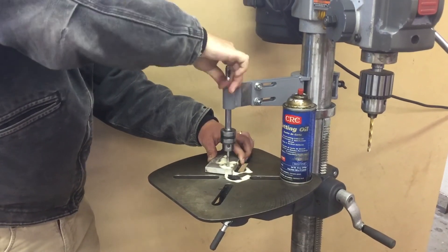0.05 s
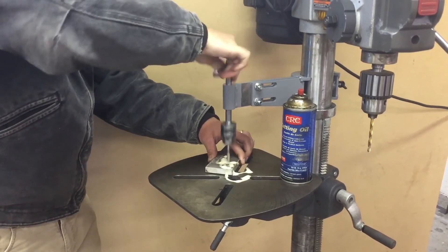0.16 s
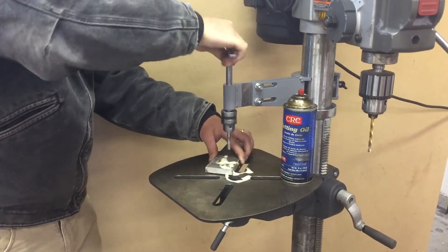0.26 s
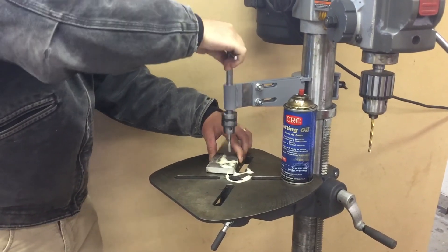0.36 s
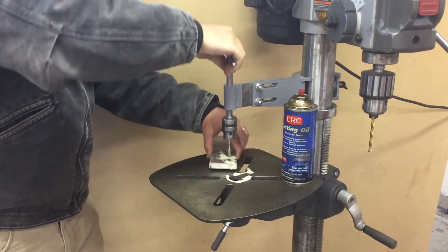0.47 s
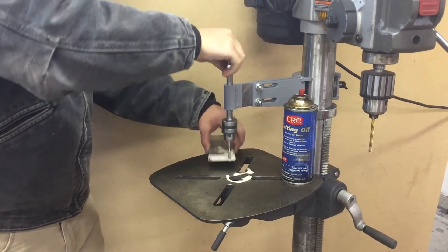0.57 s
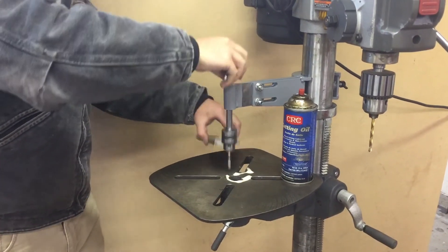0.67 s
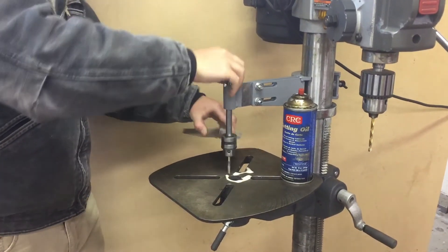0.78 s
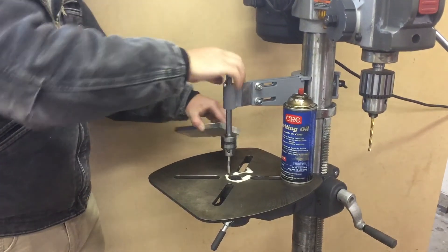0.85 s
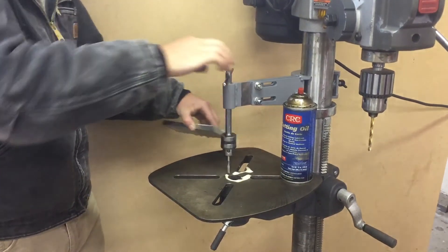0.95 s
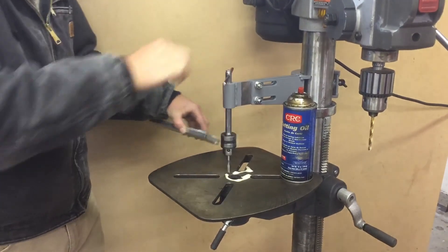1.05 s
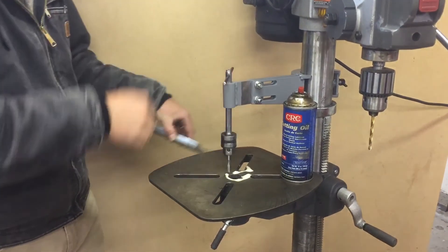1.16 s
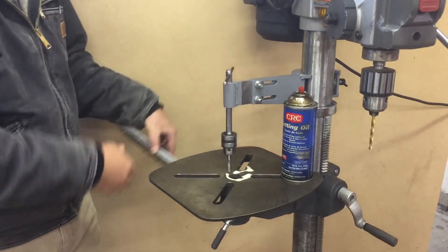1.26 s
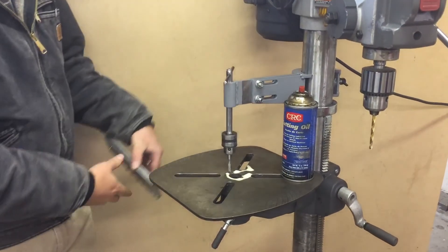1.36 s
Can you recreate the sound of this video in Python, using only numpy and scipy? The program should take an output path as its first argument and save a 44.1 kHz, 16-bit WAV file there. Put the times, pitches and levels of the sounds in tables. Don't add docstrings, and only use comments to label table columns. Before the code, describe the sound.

A small metal plate scrapes over a steel table, clanks against a tap, then knocks the table edge

```python
import sys
import numpy as np
from scipy import signal
from scipy.fft import rfft, irfft
from scipy.io import wavfile
from scipy.ndimage import uniform_filter1d

SR = 44100
rng = np.random.default_rng(int(sys.argv[2]) if len(sys.argv) > 2 else 0)


def transcribe(signal):
    frames = np.atleast_2d(signal).T
    limited = np.clip(frames, -1, 1)
    pcm = np.round(limited * 32767).astype(np.int16)
    wavfile.write(sys.argv[1], SR, pcm)


def how_loud(loudness_db):
    steps = np.asarray(loudness_db, float) / 20
    return 10 ** steps


N = 63945

# time in seconds, level in dB.
CLANK_CONTACTS = [
    (.3184, -16.5),
    (.3198, -12),
    (.3216, -13),
    (.3250, -14),
    (.3276, -17),
    (.3315, -23),
    (.336, -24),
    (.362, -25.5),
]
# frequency in Hz, level in dB per Hz.
TAP_SPECTRUM = [(71, -45), (120, -20), (624, -9.5), (2810, -4), (3110, 1), (7860, -12.5), (11200, -12),
                (14900, -17), (16500, -51)]
# frequency in Hz, time to fall 60 dB in seconds.
TAP_DECAY = [(150, 0.91), (500, 0.15), (1500, 0.21), (4000, 0.16), (8000, 0.078), (15000, 0.014)]
# time in seconds, level in dB.
KNOCK_CONTACTS = [
    (.8048, -19.5),
    (.8065, -15.5),
    (.8125, -19.5),
    (.8155, -20.5),
    (.820, -19.5),
    (.826, -28),
    (.833, -19),
    (.839, -65),
]


def evened(x):
    return x / np.sqrt(np.mean(x ** 2) + 1e-20)


def read(points, hz):
    f, value = np.transpose(points)
    return np.interp(np.log(hz + 1), np.log(f + 1), value)


def colour(x, points):
    gain = how_loud(read(points, np.fft.rfftfreq(len(x), 1 / SR)))
    return irfft(rfft(x) * gain, len(x))


def wobble(length, span_s):
    span = int(span_s * SR) + 1
    z = rng.standard_normal((length, 2))
    for _ in range(2):
        z = uniform_filter1d(z, span, axis=0)
    return evened(z[:, 0]) + 1j * evened(z[:, 1])


def dying(x, t60):
    hz, t, z = signal.stft(x, SR, nperseg=256)
    fall_s = np.maximum(read(t60, hz), .02)[:, None]
    return signal.istft(z * how_loud(-60 * t / fall_s), SR, nperseg=256)[1][:len(x)]


def rings(modes, rough=0):
    t = np.arange(SR // 2) / SR
    total = np.zeros(len(t))
    for hz, db, t60 in modes:
        waver = 1 + rough * wobble(len(t), .025)
        tone = waver * np.exp(2j * np.pi * (hz * t + rng.random()))
        total += how_loud(db - 60 * t / t60) * tone.real
    return total


def room(x):
    # frequency in Hz, time to fall 60 dB in seconds.
    room_decay = [(200, 0.6), (600, 0.51), (2000, 0.55), (4000, 0.54), (12000, 0.28)]
    taps = np.zeros(SR)
    at = np.arange(300, SR - 20, 20)
    taps[at + rng.integers(0, 20, len(at))] = rng.choice([-1., 1.], len(at))
    tail = dying(taps, room_decay)
    return signal.fftconvolve(x, tail / np.linalg.norm(tail))[:N]


def drag(stroke, spectrum, peaks, ring_db):
    grit_per_s, grit_spread_db = 5000, 3.5
    s, db, bright = np.transpose(stroke)
    t = np.arange(N) / SR
    strength = how_loud(grit_spread_db * np.minimum(rng.exponential(1, N), 4))
    grit = strength * (rng.random(N) < grit_per_s / SR) * rng.choice([-1, 1], N)
    modes = [(hz, level, 3.5 / width) for hz, width, level in peaks]
    sung = signal.fftconvolve(grit, rings(modes))[:N]
    rasp = evened(colour(grit, spectrum)) + how_loud(ring_db - 4) * evened(sung)
    hz, at, z = signal.stft(rasp, SR, nperseg=256)
    tilt = np.log2(np.maximum(hz, 200) / 2000)[:, None] * np.interp(at, s, bright)
    rasp = signal.istft(z * how_loud(tilt), SR, nperseg=256)[1][:N]
    rasp = signal.sosfilt(signal.butter(10, 15500, fs=SR, output="sos"), rasp)
    out = rasp * how_loud(np.interp(t, s, db, left=-120, right=-120))
    return out + how_loud(-4.5) * room(out)


def first_stroke():
    # time in seconds, level in dB, brightness in dB per octave above 2 kHz.
    drag_path = [(.178, -61.5, 1.5), (.186, -52, -2), (.2, -45, 1), (.204, -37, 0.5), (.216, -40.5, 3.5),
                 (.221, -30, 2.5), (.232, -34.5, 2.5), (.25, -36, 0), (.27, -42.5, -1.5), (.285, -41, 2),
                 (.31, -38, -1), (.474, -51.5, -2.5), (.484, -42, 4), (.51, -50, -0.5), (.56, -62.5, -8),
                 (.61, -82, 1)]
    # frequency in Hz, level in dB per Hz.
    drag_spectrum = [(100, -23), (200, -8), (400, 1), (900, -5.5), (2300, -1), (4500, -12.5), (15000, -42),
                     (15900, -69.5)]
    # resonance in Hz, its width in Hz, level in dB.
    drag_peaks = [(405.8, 31, 2), (671.6, 21, -3), (1840, 35, -2), (1113, 80, -2), (2063, 250, -1),
                  (2358, 54, 1), (2530, 90, -0.5), (2830, 60, -3.5), (3214, 220, 3.5), (4310, 200, -1),
                  (5360, 150, -5.5), (5620, 84, -8.5)]
    return drag(drag_path, drag_spectrum, drag_peaks, ring_db=1.5)


def second_stroke():
    # time in seconds, level in dB, brightness in dB per octave above 2 kHz.
    slide_path = [
        (.645, -76, 3),
        (.665, -54, -3.5),
        (.695, -56, 0.5),
        (.715, -50.5, -2.5),
        (.745, -52.5, -3.5),
        (.78, -50, -2.5),
        (.81, -49, 6.5),
        (.84, -64, -15.5),
    ]
    # frequency in Hz, level in dB per Hz.
    slide_spectrum = [(150, -32.5), (400, -3), (600, -9.5), (900, -9), (1800, -1), (4000, -13),
                      (15900, -42.5)]
    # resonance in Hz, its width in Hz, level in dB.
    slide_peaks = [(532, 45, 4.5), (596, 40, 1), (672, 150, 1), (790, 69, -6.5), (1160, 38, -2),
                   (1470, 50, -11), (1960, 100, -3.5), (2360, 80, -5), (2754, 54, -12.5)]
    return drag(slide_path, slide_spectrum, slide_peaks, ring_db=2.0)


def blow(rows, spectrum, t60, crack_s, crack_db, dense_db):
    t, out = np.arange(SR // 2) / SR, np.zeros(N + SR)
    for s, db in rows:
        noise = evened(colour(rng.standard_normal(len(t)), spectrum))
        crack = noise * how_loud(crack_db) * np.exp(-t / crack_s)
        body = crack + how_loud(dense_db) * dying(noise, t60)
        out[round(s * SR):][:len(t)] += how_loud(db) * body * np.minimum(t / 0.000309, 1)
    return out[:N]


def clank():
    return blow(CLANK_CONTACTS, TAP_SPECTRUM, TAP_DECAY, crack_s=0.00094, crack_db=4.5, dense_db=-12)


def knock():
    # frequency in Hz, level in dB per Hz.
    edge_spectrum = [(120, -19.5), (480, -12), (620, -1), (1200, -5.5), (2100, -7), (4500, -16),
                     (5000, -20.5), (15000, -29), (15900, -62)]
    # frequency in Hz, time to fall 60 dB in seconds.
    edge_decay = [(150, 0.94), (500, 0.28), (1500, 0.29), (4000, 0.22), (8000, 0.11), (15000, 0.081)]
    return blow(KNOCK_CONTACTS, edge_spectrum, edge_decay, crack_s=0.00061, crack_db=-2.5, dense_db=-10.5)


def struck(start_s, modes, swell_s):
    t, out = np.arange(SR // 2) / SR, np.zeros(N + SR)
    damp_db_per_s2 = 220
    for group, db in modes:
        fade = how_loud(db - damp_db_per_s2 * t ** 2) * np.minimum(t / swell_s, 1)
        out[round(start_s * SR):][:len(t)] += fade * rings(group, .14)
    return out[:N]


def plate_ringing():
    # tone in Hz, level in dB, time to fall 60 dB in seconds.
    plate_low = [(562.4, -14.5, 1), (677, -19, 0.12), (853, -23, 0.34), (1157, -8, 0.41), (2090, -3, 0.17),
                 (2480, -4.5, 0.17), (2575, -13, .15), (3036, -5.5, 0.19), (3142, -9, 0.22),
                 (3660, -24, 0.51), (4187, -17, 0.22)]
    plate_high = [(6660, -12.5, .2), (8540, -9.5, 0.18), (10200, 0.5, 0.15), (10750, 2.5, 0.19),
                  (13300, -6, 0.064), (14720, -9.5, .1)]
    return struck(CLANK_CONTACTS[0][0], [(plate_low, -24), (plate_high, -34)], swell_s=0.0019)


def table_ringing():
    # tone in Hz, level in dB, time to fall 60 dB in seconds.
    table_low = [(284, -8.5, 0.34), (548, -3, 0.33), (675.4, -2.5, 0.79), (835, 5, 0.1), (899, 2.5, 0.14),
                 (956, 4, 0.13), (1077, 2, 0.18), (1208, -2, 0.23), (1530, -5.5, 0.53), (1794, 0, 0.4),
                 (1879, -16, 0.71), (2140, -23, 0.22), (2283, -12, 0.14)]
    table_high = [(2430, 4.5, 0.17), (2606, -2, 0.24), (2781, 1.5, 0.34), (2900, 2.5, 0.22),
                  (2990, -4.5, 0.37), (3264, -17, 0.49), (3650, -4.5, 0.15), (4000, -6, 0.14),
                  (4226, -5.5, 0.17), (4520, -9.5, 0.19), (4680, -24, 0.098), (5280, -2, 0.086),
                  (6120, -4, 0.076)]
    return struck(KNOCK_CONTACTS[0][0], [(table_low, -25), (table_high, -29)], swell_s=.011)


def settling():
    # time in seconds, level in dB.
    settle_contacts = [
        (.334, -28.5),
        (.345, -34),
        (.358, -37),
    ]
    # tone in Hz, level in dB, time to fall 60 dB in seconds.
    settle_tones = [(275, -7.5, 0.22), (384, 2, 0.16), (465, -8.5, 0.54), (564, -3.5, 0.43),
                    (146, -23, 0.42)]
    impulses = np.zeros(N)
    for s, db in settle_contacts:
        impulses[round(s * SR)] += how_loud(db) * rng.choice([-1, 1])
    swell = np.minimum(np.arange(SR // 2) / SR / .004, 1)
    return signal.fftconvolve(impulses, rings(settle_tones, 0.26) * swell)[:N]


def chirps():
    # time in seconds, level in dB.
    touches = [
        (.1888, -56.5),
        (.1958, -52.5),
        (.2028, -49),
        (.218, -46.5),
        (.2215, -45.5),
        (.4812, -52),
        (.4932, -43),
        (.7132, -63),
    ]
    return blow(touches, TAP_SPECTRUM, TAP_DECAY, crack_s=0.0035, crack_db=-8.5, dense_db=-11)


def brief_tones():
    # start in seconds, length in seconds, pitch in Hz.
    tone_list = [(.216, .01, 9200), (.27, .022, 13500), (.28, .02, 11400), (.283, .02, 14600),
                 (.481, .008, 4400), (.479, .022, 9840), (.481, .01, 6300), (.481, .012, 8440),
                 (.497, .025, 13900), (.535, .075, 3430), (.50, .095, 1594), (.56, .06, 673),
                 (.665, .03, 680), (.714, .025, 1260), (.722, .018, 3700), (.765, .03, 3850),
                 (.43, .07, 148), (.83, .05, 160), (.91, .085, 50), (.209, .065, 175), (.391, .093, 10760),
                 (.493, .012, 4480), (.488, .03, 2778), (.488, .04, 3354), (.482, .035, 1880),
                 (.525, .012, 4350), (.50, .012, 6300), (.50, .015, 8440), (.70, .012, 1814),
                 (.715, .01, 1950), (.775, .02, 1590), (.735, .015, 530), (.77, .025, 565), (.25, .06, 684),
                 (.34, .03, 385), (.40, .17, 380), (.40, .17, 565), (.28, .03, 4300), (.28, .03, 5324),
                 (1.04, .07, 165), (.90, .145, 1876), (.90, .19, 1513), (1.0, .1, 2950), (.86, .07, 2781),
                 (.89, .1, 552), (1.15, .07, 2500), (.37, .07, 822), (.183, .02, 1600), (.328, .05, 4250),
                 (.72, .07, 800), (.33, .05, 10760)]
    tone_levels = [-56, -64, -67.5, -68.5, -41, -53, -64, -60, -66, -54, -56, -47.5, -50, -52.5, -57.5, -58,
                   -50.5, -48, -50, -56, -65, -41, -46, -54, -46, -48.5, -55, -58.5, -45.5, -54, -58, -64,
                   -56, -46, -41, -57.5, -47, -52.5, -55.5, -56.5, -50.5, -58, -66, -43.5, -55.5, -71, -45,
                   -54.5, -36.5, -60.5, -47]
    waver_cycles, fade_s = 35, .008
    t, out = np.arange(N) / SR, np.zeros(N)
    for (s, length, hz), db in zip(tone_list, tone_levels):
        shape = np.clip((t - s) / 0.0011, 0, 1) * np.exp(-np.maximum(t - s - length, 0) / fade_s)
        waver = 1 + 0.28 * wobble(N, waver_cycles / hz)
        out += how_loud(db) * shape * (waver * np.exp(2j * np.pi * hz * t)).real
    return out


def fan():
    # time in seconds, pitch in Hz, level in dB.
    hum_path = [
        (0.0, 82.5, -59),
        (0.27, 73.9, -57),
        (0.282, 81.8, -63),
        (0.382, 78.4, -55.5),
        (0.9, 78.1, -51.5),
        (0.908, 78.7, -60),
        (1.041, 76.3, -52),
        (1.45, 77, -53),
    ]
    t = np.arange(N) / SR
    s, hz, db = np.transpose(hum_path)
    level = how_loud(np.interp(t, s, db) + 1.1 * wobble(N, 0.035).real)
    phase = 2 * np.pi * np.cumsum(np.interp(t, s, hz)) / SR + 1.8
    return np.sqrt(2) * level * np.sin(phase)


def still_air():
    # frequency in Hz, level in dB per Hz.
    air_spectrum = [(25, -55.5), (40, -18), (55, -8), (91, -18), (150, -15.5), (332, -26.5), (1300, -31.5),
                    (15400, -50), (16000, -71)]
    return how_loud(-61) * evened(colour(rng.standard_normal(N), air_spectrum))


def sleeve():
    # time in seconds, level in dB.
    rustle_path = [
        (1.29, -97),
        (1.31, -65.5),
        (1.35, -69.5),
        (1.45, -74),
    ]
    # frequency in Hz, level in dB per Hz.
    cloth_spectrum = [(300, -12), (3000, 0.5), (6500, -8.5), (12000, -16.5), (15800, -49)]
    noise = rng.standard_normal(N)
    flutter = how_loud(2 * evened(uniform_filter1d(rng.standard_normal(N), size=300)))
    cloth = evened(colour(noise * flutter, cloth_spectrum))
    return cloth * how_loud(np.interp(np.arange(N) / SR, *np.transpose(rustle_path)))


def scene():
    hits = clank() + knock() + settling() + chirps()
    metal = plate_ringing() + table_ringing()
    rubs = brief_tones()
    work = metal + how_loud(-16.5) * room(metal)
    work += hits + how_loud(-11.5) * room(hits)
    work += first_stroke()
    work += second_stroke()
    work = signal.sosfilt(signal.butter(2, 112, "high", fs=SR, output="sos"), work)
    mix = work + rubs + how_loud(-14) * room(rubs) + fan() + still_air() + sleeve()
    return mix[None]


def top_cut(x):
    return signal.sosfilt(signal.butter(12, 16800, fs=SR, output="sos"), x)


def record(dry):
    return top_cut(dry)


dry = scene()
out = record(dry)
transcribe(out)
```